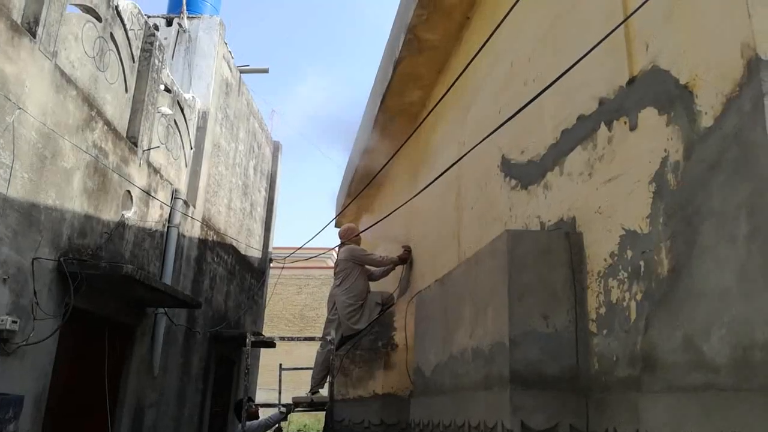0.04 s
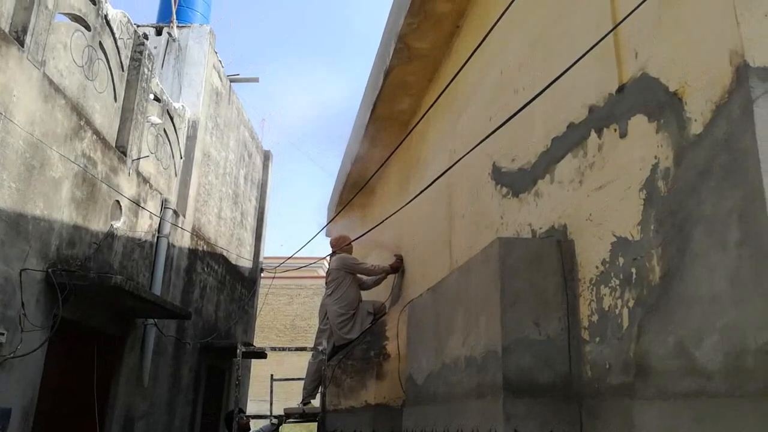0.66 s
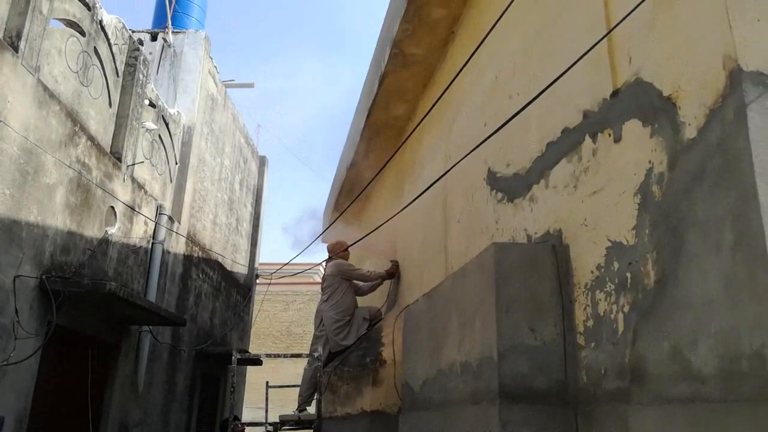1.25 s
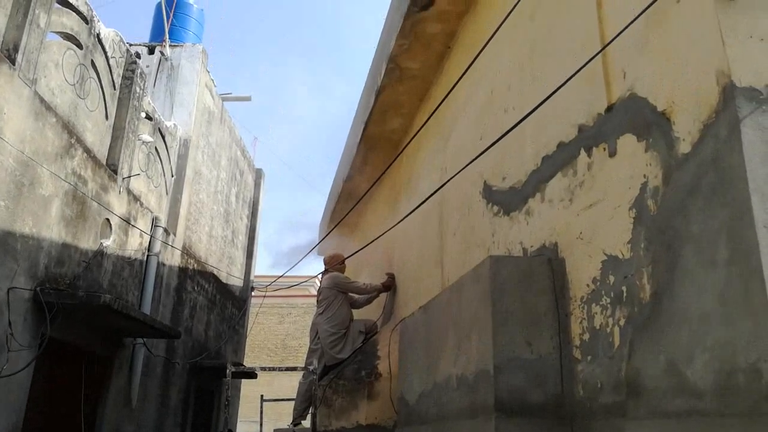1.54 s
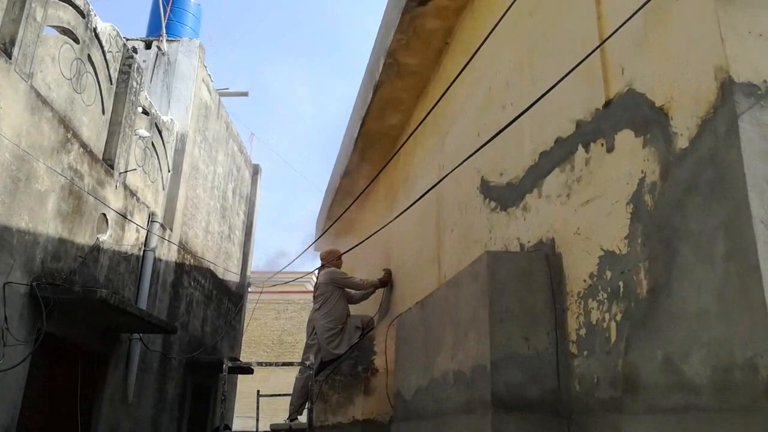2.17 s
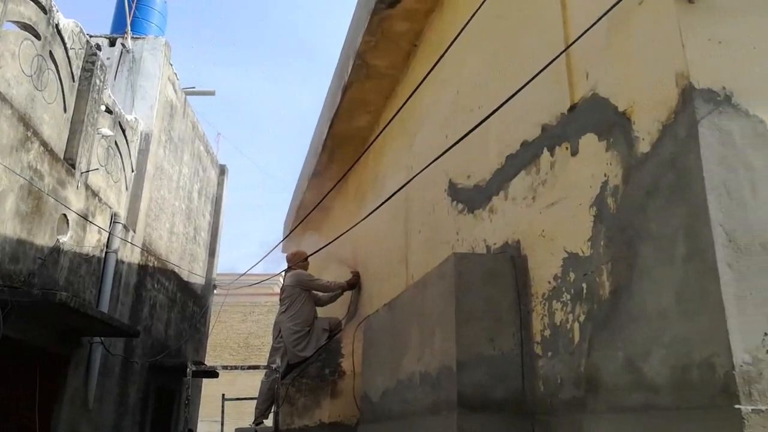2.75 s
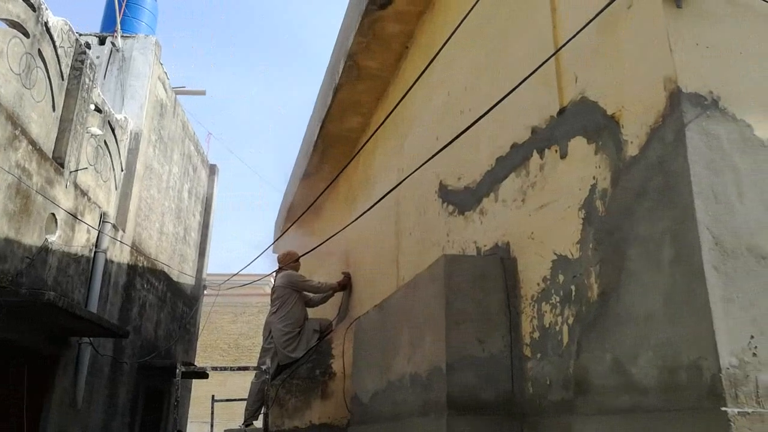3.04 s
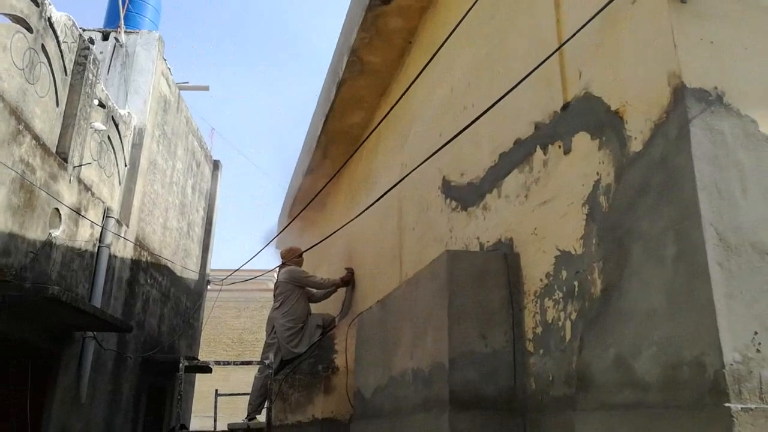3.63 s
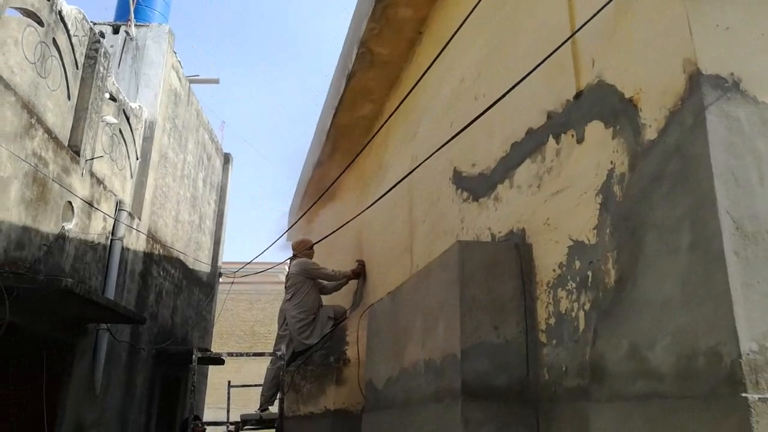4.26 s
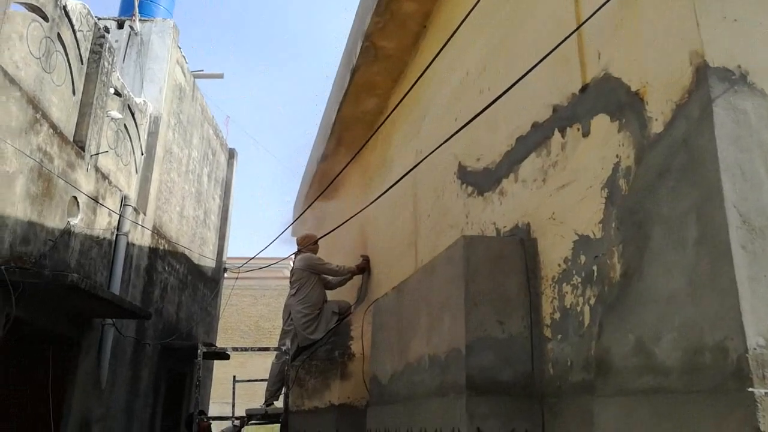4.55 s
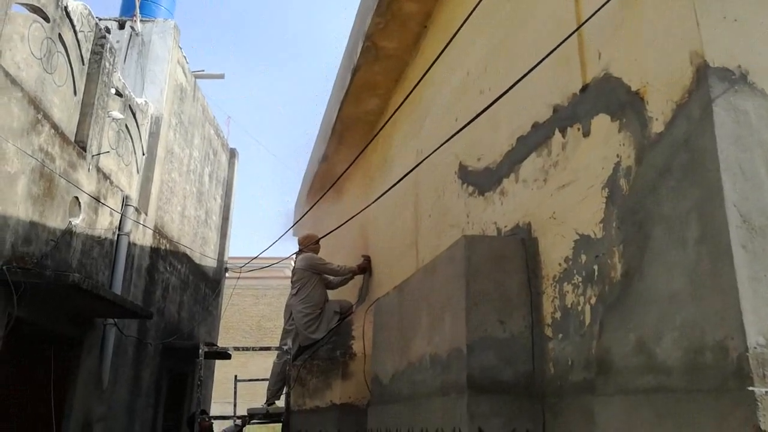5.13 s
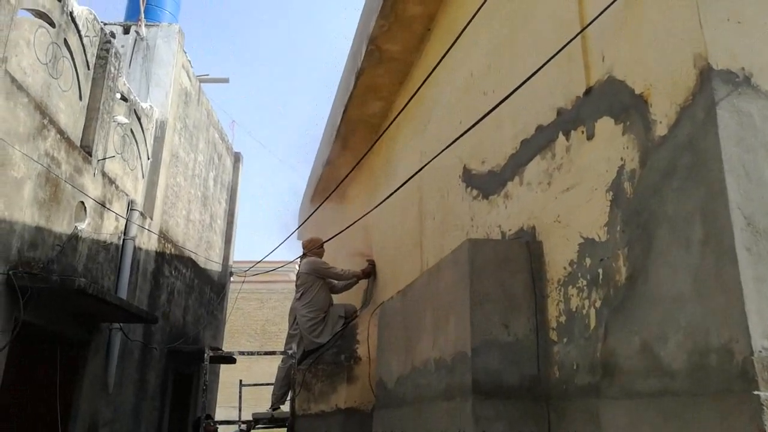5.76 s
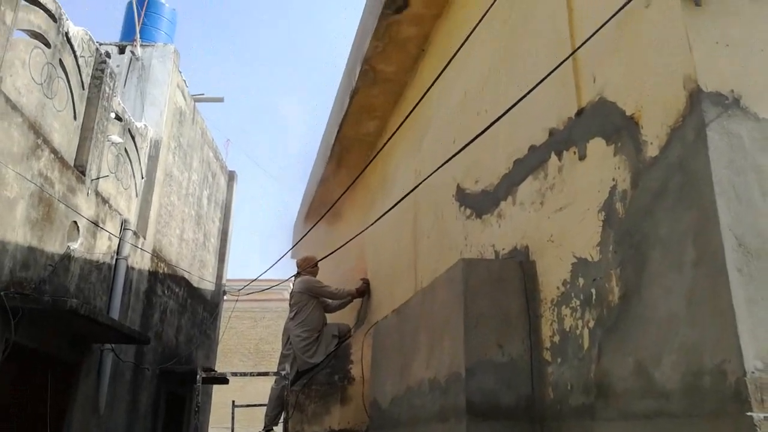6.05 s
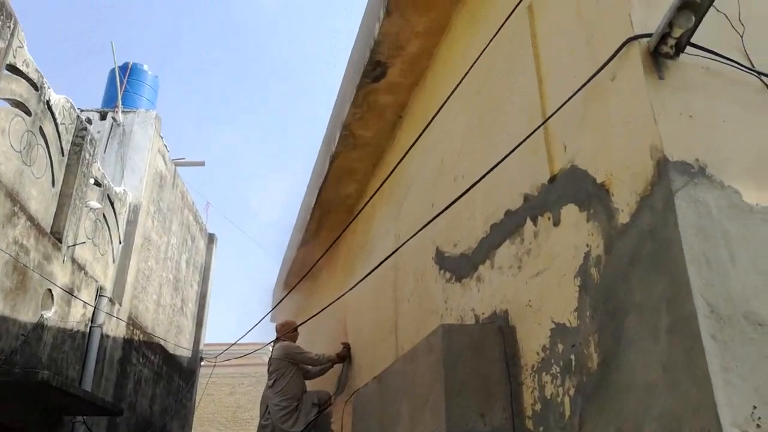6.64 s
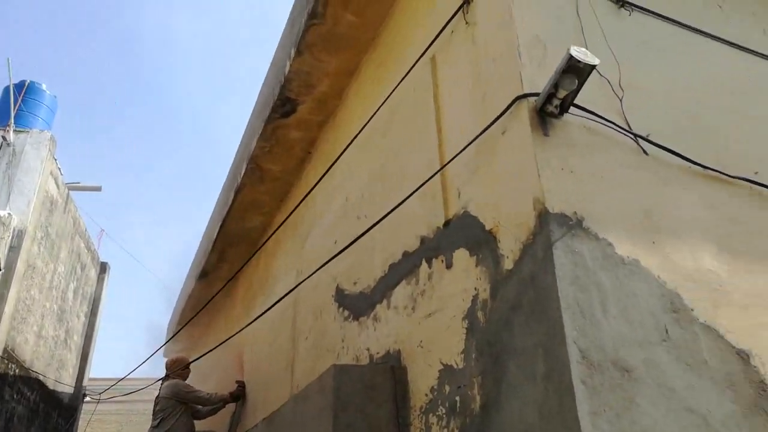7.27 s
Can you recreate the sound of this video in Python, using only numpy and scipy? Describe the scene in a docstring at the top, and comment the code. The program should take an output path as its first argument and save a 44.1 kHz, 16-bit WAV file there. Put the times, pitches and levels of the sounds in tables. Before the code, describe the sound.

An angle grinder works on a plaster wall some way off in a narrow alley, making a continuous harsh, gritty hiss that echoes between the houses. Its whine and motor hum rise and fall with the pressure, and the steel disc rings. Twice the motor sags and the disc squeals briefly, the second time harder, before picking up again. A light breeze bumps the microphone underneath.

```python
"""A harsh, gritty hiss: an angle grinder works on plaster high on a wall, some way off in a narrow alley.
Grit cracks off under the disc and echoes between the houses; leaning on the tool slows the motor and
changes the hiss. The disc's ten segments whine, and its steel sings, or squeals when it binds in the wall.
Underneath, the motor hums and the wobbling disc drums. In the background the alley booms,
a breeze bumps the microphone and something hoots once, faintly."""
import sys
import numpy as np
from scipy import signal
from scipy.fft import rfft, irfft
from scipy.io import wavfile

SR = 44100
rng = np.random.default_rng(int(sys.argv[2]) if len(sys.argv) > 2 else 0)


def inscribe(sig):
    """Save sig as 16-bit PCM at rate SR to the path in sys.argv[1].

    A 1-D sig is mono; a 2-D sig holds one channel per row.
    Samples are clipped to [-1, 1] before scaling.
    """
    pcm = np.round(np.clip(np.atleast_2d(sig).T, -1, 1) * 32767)
    wavfile.write(sys.argv[1], SR, pcm.astype(np.int16))


N = 321930
TIME = np.arange(N) / SR
FROM_MIDDLE_S = TIME - TIME.mean()
FREQ = np.maximum(np.arange(N // 2 + 1) * SR / N, 1)
SEGMENTS, GEAR_RATIO = 10, 12 / 37
HELD_SPEED, FREE_SPEED, USUAL_SPEED = 325, 372, 420  # motor turns a second: bound, just free, normal load


# Larger chips flying off. Each row: time in seconds, size in dB above the grit.
BIG_CHIPS = [(2.216, 18), (2.793, 24), (3.771, 18), (5.833, 22), (5.955, 19)]

def grit(disc_turns, grains_per_s=30000, size_db=1.27, throb=0.038, chop=0.14):
    """Grains crack off the plaster as each segment passes, most strongly at the disc's high spot."""
    high_spot = 1 + throb * np.cos(2 * np.pi * disc_turns)
    segment_contact = 1 + chop * np.cos(2 * np.pi * SEGMENTS * disc_turns)
    grains = rng.standard_normal((2, N)) * (rng.random((2, N)) < grains_per_s / SR)
    sizes = from_db(size_db * np.minimum(rng.exponential(1, (2, N)), 6))
    grains = grains * high_spot * segment_contact * sizes
    for start, chip_db in BIG_CHIPS:
        grains[:, round(start * SR)] += from_db(chip_db)
    return grains


# The tone colour of the grit. Each row: frequency in Hz, level in dB.
GRIT_COLOUR = [(200, -35), (520, -24), (1000, -16.5), (1620, -12.5), (2480, -4.5), (2750, -1), (3200, -3.5),
               (4000, -5.5), (5000, -10.5), (5800, -11.5), (6600, -20.5), (7000, -16), (7700, -19.5)]
# Where the disc and its guard ring. Each row: pitch in Hz, width in Hz, boost in dB.
DISC_RESONANCES = [(572, 40, 4), (978, 30, 3.5), (1102, 35, 4), (1233, 45, 5), (1480, 110, 3),
                   (1940, 32, 4.5), (2058, 32, 3.5), (2250, 70, 3), (2620, 50, 3), (2750, 90, 3),
                   (2920, 100, 2.5), (3284, 25, 2), (3480, 110, 2.5), (5510, 150, 2.5), (6920, 130, 3),
                   (7480, 90, 2)]
# Which side the hiss comes from. Each row: frequency in Hz, dB by which left is louder.
HISS_BALANCE = [(400, -1), (1100, -1.5), (1500, 1.5), (2100, 1.5), (2900, -0.5), (3500, -4), (4200, -6.5),
                (5600, -8), (7200, -3)]

def hiss(grains):
    """The grains ring the disc and guard and echo off the house walls, blurring into a hiss."""
    ring_db = sum(db * abs(resonance(hz, width)) ** 2 for hz, width, db in DISC_RESONANCES)
    colour = from_db(over_freq(GRIT_COLOUR) + ring_db)
    walls = 1 + wall_echoes(decay_s=0.6, echo_db=-7)
    spectrum = spread(rfft(grains) * walls) * colour * pan(over_freq(HISS_BALANCE))
    return spectrum / np.std(irfft(spectrum, N))


# How each band of the hiss changes. Each row: centre in Hz, dB per dB of bite, dB per percent of
# motor slowing, dB per second as the microphone turns, dB added when the disc binds fully.
HISS_BANDS = [(1450, 0.15, -0.0116, 0.04, -2.2), (2500, 1.2, -0.0037, 0.14, -3),
              (4100, 0.5, 0.0985, -0.12, .8), (5530, 0.54, 0.0733, 0.02, -8.5),
              (6900, 1.23, 0.0031, 0.16, -1.5)]
# The hiss flares as the disc tilts. Each row: time and half length in seconds, pitch in Hz, rise in dB.
TILT_FLARES = [(.3, .12, 3950, 3), (2.15, .05, 5460, 2), (2.62, 0.065, 5460, 4), (2.78, .09, 3950, 1),
               (3.55, .1, 5460, 3), (3.8, .14, 3950, 2), (5.4, .08, 5460, 3), (7.0, 0.14, 3950, 2)]

def grinding(disc_turns, bite_db, slowing_percent, binding, level_db=-22.0, patchy_db=0.85):
    """A harder bite makes the hiss louder and brighter; patchy plaster makes it flicker."""
    spectrum = hiss(grit(disc_turns))
    centres = np.transpose(HISS_BANDS)[0]
    times, half_lengths, flare_hz, rise_db = np.transpose(TILT_FLARES)
    out = 0
    for share, (_, per_bite, per_slowing, per_s, bound_db) in zip(np.eye(len(centres)), HISS_BANDS):
        # share is 1 at this band's centre and 0 at the others, so the bands blend
        band = irfft(spectrum * over_freq(list(zip(centres, share))), N)
        load_db = per_bite * bite_db + per_slowing * slowing_percent + bound_db * binding
        flare_db = swells(times, half_lengths, rise_db * np.interp(flare_hz, centres, share))
        out += band * from_db(load_db + per_s * FROM_MIDDLE_S + flare_db + patchy_db * drift(9.3))
    return from_db(level_db) * out


# How well the whine carries. Each row: pitch in Hz, level in dB.
WHINE_BY_PITCH = [(1080, -55), (1300, -48.5), (1470, -41.5), (1600, -48), (2300, -46.5), (2550, -41),
                  (2680, -39), (2830, -36), (2905, -29.5), (2965, -33), (3020, -38.5), (3400, -42),
                  (4000, -40), (4150, -45.5), (4400, -43), (4720, -39.5)]
# The lowest note of the whine comes and goes. Each row: time in seconds, change in dB.
LOW_WHINE_CHANGES = [(0, -0.5), (.6, -5), (1.05, 2.5), (1.7, 3), (2.9, -3), (4.0, 1.5), (4.4, -7),
                     (5.4, -10), (6.4, 0.5), (7.3, -0.5)]

def segment_whine(disc_turns, disc_speed, bite_db, db_per_bite=0.05):
    """The slots between the segments chop the air into a whine; rough contact makes it flutter."""
    passes, hz = SEGMENTS * disc_turns, SEGMENTS * disc_speed
    first = tone(passes, rough=0.45, left_db=3, lag=0.3, flutter_rate=8)
    second = tone(2 * passes, rough=0.45, left_db=5.5, lag=0.6, flutter_rate=7)
    third = tone(3 * passes, rough=0.4, left_db=-1.5, lag=0.9, flutter_rate=7)
    notes = (from_db(over_time(LOW_WHINE_CHANGES)) * first, second, third)
    whine = sum(at_pitch(WHINE_BY_PITCH, order * hz) * note for order, note in enumerate(notes, 1))
    return from_db(db_per_bite * bite_db) * whine


# The two notes of the steel disc. Each row: pitch in Hz, width in Hz, level in dB,
# dB by which left is louder, dB per dB of bite.
STEEL_NOTES = [(3460, 22, -40.5, -0.5, 1.0), (5508, 22, -45, -7.5, 1.0)]
# The rim catches. Each row: time and half length in seconds, dB added to the low note, to the high note.
RIM_CATCHES = [(0.054, 0.39, 5, 6), (.82, .22, 12.5, -6), (2.17, 0.058, 0, 8), (2.502, 0.23, 3, -3),
               (3.55, .08, 2, 5), (5.38, .08, 2, 5), (6.5, 0.11, 12, -2)]

def disc_singing(bite_db, waver_db=4.0, db_per_s=-0.4):
    """Rubbing keeps two notes ringing. They swell or dip as the rim catches, and fade as the mic turns."""
    times, half_lengths, *changes = np.transpose(RIM_CATCHES)
    out = 0
    for (hz, width, db, left_db, per_bite), catch_db in zip(STEEL_NOTES, changes):
        rubbing = rfft(rng.standard_normal((2, N)))
        note = ring(rubbing, hz, width)
        level_db = db + per_bite * bite_db + swells(times, half_lengths, catch_db) + waver_db * drift(4)
        out += note * from_db(level_db) * pan(left_db)
    return out * from_db(db_per_s * FROM_MIDDLE_S)


# The notes of a binding disc. Each row: pitch in Hz, width in Hz, level in dB when fully bound.
SQUEAL_NOTES = [(1950, 49, -34.5), (3320, 200, -32.5), (3780, 190, -24), (5330, 50, -37), (7450, 110, -37)]

def disc_squeal(binding):
    """The harder the wall holds the disc, the more it squeals."""
    return binding * ringing(SQUEAL_NOTES) * pan(-2.2)


# How well the motor's hum carries. Each row: pitch in Hz, level in dB.
HUM_BY_PITCH = [(325, -69), (360, -58), (405, -52.5), (425, -44.5), (436, -45.5), (453, -44), (468, -48),
                (486, -52.5)]
# The hum dips briefly. Each row: time in seconds, half length in seconds, depth in dB.
HUM_DIPS = [(3.123, 0.012, 6), (4.782, 0.063, 22), (5.17, 0.044, 11), (5.386, 0.017, 16), (6.25, 0.022, 8),
            (6.88, 0.042, 15)]

def motor_hum(turns, speed, db_per_s=0.45, housing_hz=1040, housing_width_hz=130):
    """The rotor hums once a turn, rougher under load; the air in its housing boosts nearby overtones."""
    rough = np.interp(speed, [HELD_SPEED, USUAL_SPEED], [1.5, 0.3])
    hum = tone(turns, rough, left_db=-3.5, lag=0.33, flutter_rate=14)
    level_db = db_per_s * FROM_MIDDLE_S - swells(*np.transpose(HUM_DIPS))  # grows as the microphone turns
    out = at_pitch(HUM_BY_PITCH, speed) * from_db(level_db) * hum
    for order in (2, 3):
        nearness = 1 / (1 + (2 * (order * speed - housing_hz) / housing_width_hz) ** 2)
        out += from_db(-44) * nearness * tone(order * turns, rough=0.62, left_db=1.5, lag=0.5)
    return out


# Low pitches where the wobble booms. Each row: pitch in Hz, width in Hz, level in dB.
WOBBLE_RESONANCES = [(107.9, 18, -51), (155.6, 11, -47), (222, 26, -49), (288.2, 16, -58.5)]
# The drone at two beats a turn. Each row: time in seconds, level in dB.
DRONE_LEVELS = [(0, -70.5), (5.7, -67.5), (6.05, -54), (7.3, -55.5)]

def disc_wobble(disc_turns, once_db=-68.5):
    """The wobbling disc drums on the wall once and twice a turn, booming where it meets a resonance."""
    once = tone(disc_turns, rough=0.12, left_db=0, lag=0.05)
    twice = tone(2 * disc_turns, rough=0.35, left_db=0, lag=0.1)
    response = sum(from_db(db) * resonance(hz, width) ** 3 for hz, width, db in WOBBLE_RESONANCES)
    boom = irfft(rfft(once + twice) * response, N)
    return boom + from_db(once_db) * once + from_db(over_time(DRONE_LEVELS)) * twice


# The tone colour of the breeze. Each row: frequency in Hz, level in dB.
BREEZE_COLOUR = [(20, -5), (45, -0.5), (90, -2), (180, -3), (400, -25), (900, -32)]
# The breeze between puffs. Each row: time in seconds, level in dB.
BREEZE_LEVELS = [(0, -65), (1.3, -71), (2.0, -64), (3.2, -68), (5.5, -64.5), (6.15, -78), (7.3, -74)]
# Puffs of air. Each row: time in seconds, rise in dB.
AIR_PUFFS = [(.09, 14), (.47, 8), (1.95, 9), (2.3, 7), (3.83, 14), (4.11, 6), (4.5, 15), (4.88, 6),
             (5.05, 10)]

def breeze(gust_db=3.0, puff_half_length_s=0.06):
    """A light breeze bumps the microphone and makes a low, uneven rumble."""
    rumble = unit_power(irfft(noise_spectrum() * from_db(over_freq(BREEZE_COLOUR)), N))
    times, rise_db = np.transpose(AIR_PUFFS)
    puff_db = swells(times, puff_half_length_s, rise_db)
    return from_db(over_time(BREEZE_LEVELS) + puff_db + gust_db * drift(4.7)) * rumble


# The alley's own low notes. Each row: pitch in Hz, width in Hz, level in dB.
ALLEY_NOTES = [(112, 16, -70), (149, 30, -58), (219.8, 12, -54.5), (274.6, 40, -57)]

def alley_boom():
    """The alley booms softly at a few low pitches."""
    return ringing(ALLEY_NOTES)


def distant_hoot(start_s=2.83, end_s=3.02, hz=560, level_db=-53, fade_s=0.044):
    """One short, faint note from further off."""
    fade = np.clip(np.minimum(TIME - start_s, end_s - TIME) / fade_s, 0, 1)
    return from_db(level_db) * fade * tone(hz * TIME, rough=0.15, left_db=-8, lag=0.3)


def wall_echoes(decay_s, echo_db):
    """Left and right spectra of a scatter of echoes that dies by 60 dB in decay_s."""
    echoes = rng.standard_normal((2, N)) * from_db(-60 * np.minimum(TIME / decay_s, 2))
    energy = np.sum(echoes ** 2, axis=1, keepdims=True)
    return from_db(echo_db) * rfft(echoes / np.sqrt(energy))


# What the microphone's two openings pick up. Each row: frequency in Hz, how alike the sides are
# from 0 to 1, radians by which left is ahead.
MIC_OPENINGS = [(100, .985, 0), (330, .95, .12), (550, .5, .45), (800, .35, -.1), (1200, .45, .9),
                (1500, .45, .3), (2150, .4, -2.2), (2800, .33, .6), (3150, .3, 0), (3500, .33, 1.6),
                (4100, .4, 2.8), (5500, .25, 3.9), (7500, .15, 3.3)]

def spread(pair):
    """Two unrelated spectra become left and right, alike and in step in the bass."""
    hz, likeness, lead = np.transpose(MIC_OPENINGS)
    alike = over_freq(list(zip(hz, likeness)))
    sides = np.array([[1], [-1]])
    both = np.sqrt((1 + alike) / 2) * pair[0] + np.sqrt((1 - alike) / 2) * pair[1] * sides
    return both * np.exp(0.5j * sides * over_freq(list(zip(hz, lead))))


def noise_spectrum():
    """The spectrum of white noise, spread over left and right."""
    return spread(rfft(rng.standard_normal((2, N))))


def tone(cycles, rough, left_db, lag, flutter_rate=9):
    """A note that flutters differently on each side; right is behind left by lag radians."""
    flutter = np.array([drift(flutter_rate) + 1j * drift(flutter_rate) for side in range(2)])
    phase = 2 * np.pi * cycles + lag * np.array([[0.5], [-0.5]])
    wave = (1 + rough * flutter) * np.exp(1j * phase)
    return unit_power(wave.real) * pan(left_db)


def resonance(hz, width):
    """How strongly a ringing thing answers each frequency: 1 at its own pitch."""
    return 1 / (1 + 1j * (FREQ / hz - hz / FREQ) * hz / width)


def ring(shake, hz, width):
    """One note at unit power, rung by a spectrum of noise."""
    return unit_power(irfft(shake * resonance(hz, 2 * width) ** 2, N))


def ringing(notes):
    """Several notes rung by the same random shaking."""
    shake = noise_spectrum()
    return sum(from_db(db) * ring(shake, hz, width) for hz, width, db in notes)


def drift(rate):
    """A smooth random wander of about 1 either way; a higher rate wanders faster."""
    step, warm_up = 40, 2000
    pole = np.exp(-2 * np.pi * rate * step / SR)
    noise = rng.standard_normal(N // step + warm_up + 2)
    slow = signal.lfilter([1], [1, -2 * pole, pole * pole], noise)[warm_up:]
    return np.interp(np.arange(N) / step, np.arange(len(slow)), unit_power(slow))


def swells(times, half_lengths, heights):
    """A bell-shaped rise at each time, added up."""
    bells = np.broadcast(times, half_lengths, heights)
    return sum(height * np.exp(-((TIME - peak) / half) ** 2) for peak, half, height in bells)


def pan(left_db):
    """Left and right gains, left_db apart, that keep the total power."""
    gains = from_db(np.array([[0.5], [-0.5]]) * left_db)
    return gains / np.sqrt(np.mean(gains ** 2, axis=0))


def over_time(points):
    """Join (seconds, value) points into a curve."""
    return np.interp(TIME, *np.transpose(points))


def over_freq(points, hz=FREQ):
    """Join (Hz, value) points, with octaves evenly spaced, and read the curve at hz."""
    pitches, values = np.transpose(points)
    return np.interp(np.log(hz), np.log(pitches), values)


def at_pitch(points, hz):
    """The gain of a note, read from (Hz, dB) points."""
    return from_db(over_freq(points, hz))


def from_db(db):
    """Decibels to gain."""
    return 10 ** (np.asarray(db) / 20)


def unit_power(x):
    """Scale to an average power of 1."""
    return x / np.sqrt(np.mean(x ** 2) + 1e-20)


# How fast the motor runs. Each row: time in seconds, turns a second.
MOTOR_SPEEDS = [(0.0, 423), (0.45, 404), (0.98, 413), (1.98, 486), (2.09, 481), (2.45, 388), (2.7, 351),
                (2.84, 370), (3.11, 441), (3.36, 457), (3.56, 439), (3.73, 391), (4.06, 419), (5.13, 430),
                (5.33, 443), (5.53, 403), (5.61, 356), (5.75, 319), (6.11, 418), (6.32, 448), (6.69, 446),
                (7.3, 406)]
# How hard the disc bites. Each row: time in seconds, level in dB (only its swing about the average counts).
BITE_LEVELS = [(0.0, -19.5), (0.08, -21.5), (0.65, -21.5), (0.67, -21), (1.39, -22), (1.45, -21.5),
               (1.98, -22.5), (2.19, -18.5), (2.81, -20.5), (2.94, -25.5), (3.09, -23.5), (3.89, -20.5),
               (4.01, -23), (4.5, -21.5), (4.71, -23), (4.9, -20.5), (5.2, -22.5), (5.77, -19.5),
               (5.9, -23.5), (6.07, -25), (6.5, -22.0), (7.3, -22.5)]
# The microphone turns, so the disc shifts sideways. Each row: time in seconds, dB added to left over right.
MIC_TURN = [(0, 0.4), (1.5, 1), (3, 1.3), (4.2, 1.5), (5.7, 2.5), (6.4, 2), (7.3, 2.2)]

def scene():
    """The motor drives the disc through a gear, trembling under the load, with the alley behind it."""
    speed = over_time(MOTOR_SPEEDS)
    turns = np.cumsum(speed * (1 + 0.000997 * drift(9.4))) / SR
    disc_turns, disc_speed = GEAR_RATIO * turns, GEAR_RATIO * speed
    slowing_percent = 100 * (1 - speed / USUAL_SPEED)
    binding = np.interp(speed, [HELD_SPEED, FREE_SPEED], [1, 0])  # 1 when the wall holds the disc hardest
    bite_db = over_time(BITE_LEVELS)
    bite_db -= bite_db.mean()
    disc = grinding(disc_turns, bite_db, slowing_percent, binding)
    disc += segment_whine(disc_turns, disc_speed, bite_db)
    disc += disc_singing(bite_db) + disc_squeal(binding)
    grinder = disc * pan(over_time(MIC_TURN)) + motor_hum(turns, speed) + disc_wobble(disc_turns)
    return grinder + breeze() + alley_boom() + distant_hoot()


def record(dry):
    """The treble is cut steeply above 7740 Hz."""
    return signal.sosfilt(signal.ellip(12, 0.2, 80, 7740, fs=SR, output="sos"), dry)


dry = scene()
out = record(dry)
inscribe(out)
```